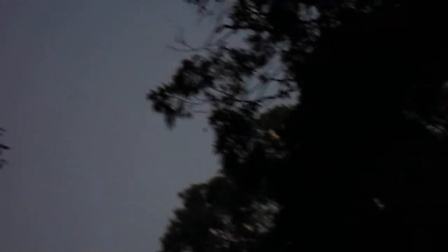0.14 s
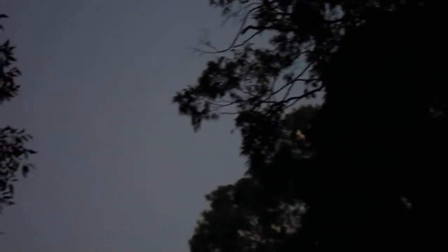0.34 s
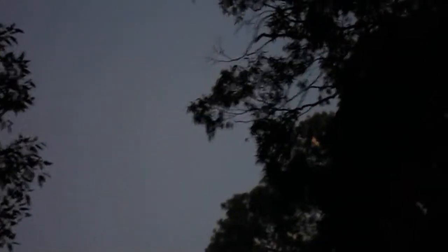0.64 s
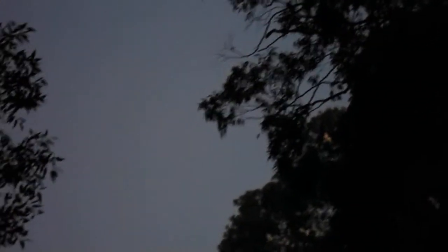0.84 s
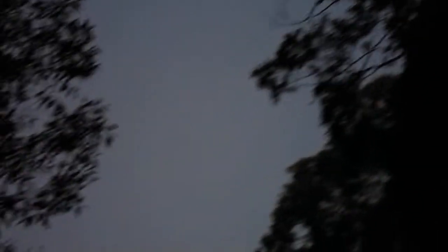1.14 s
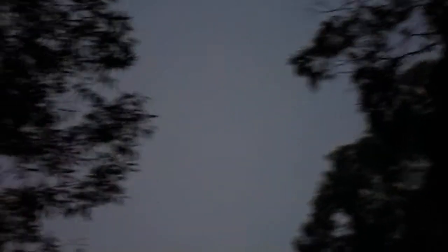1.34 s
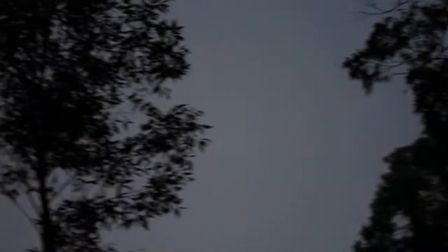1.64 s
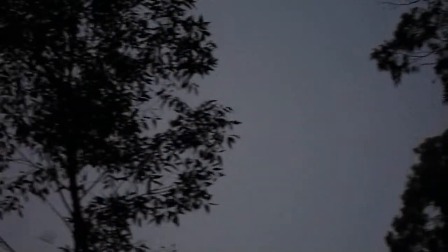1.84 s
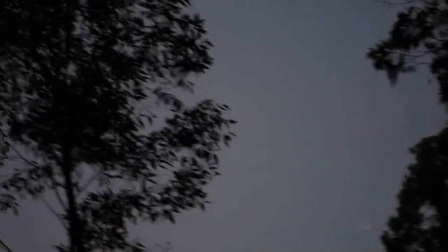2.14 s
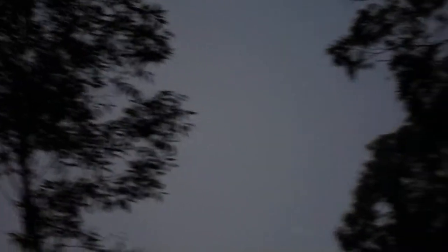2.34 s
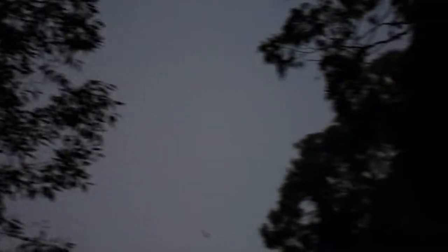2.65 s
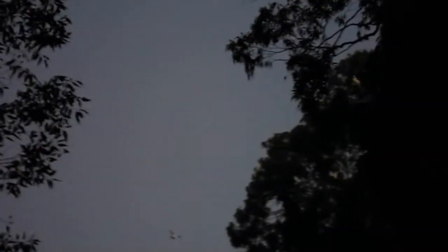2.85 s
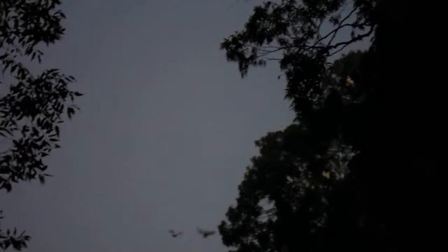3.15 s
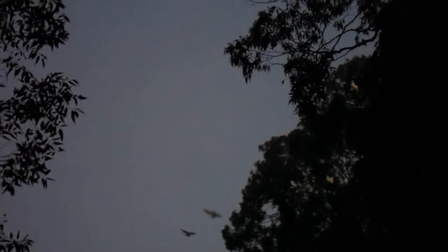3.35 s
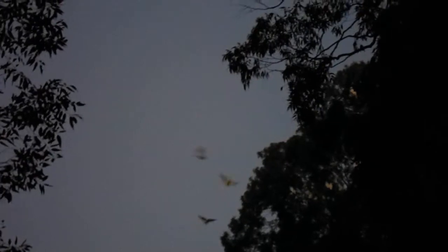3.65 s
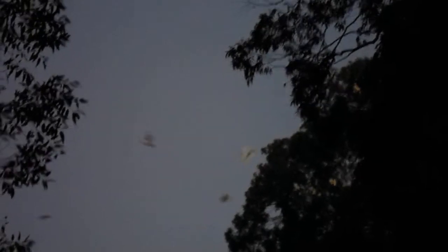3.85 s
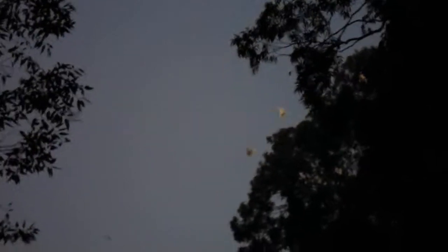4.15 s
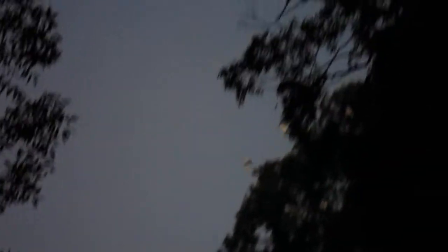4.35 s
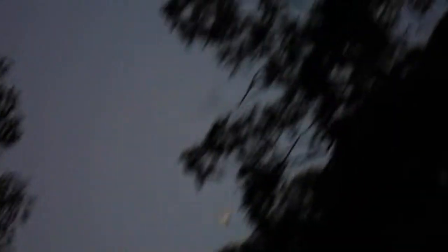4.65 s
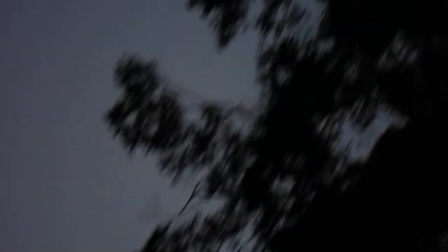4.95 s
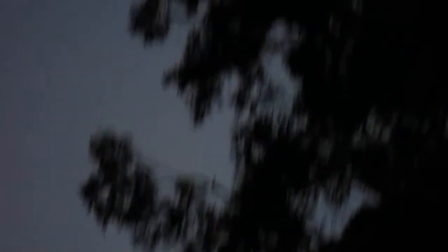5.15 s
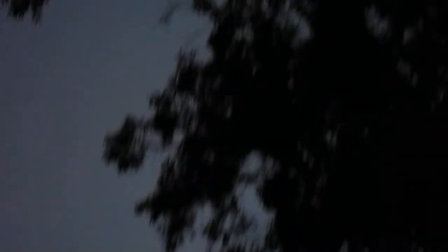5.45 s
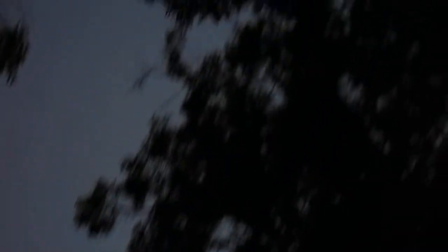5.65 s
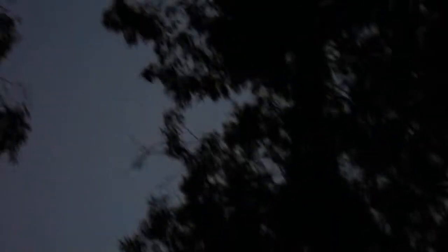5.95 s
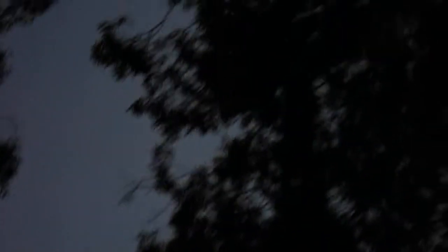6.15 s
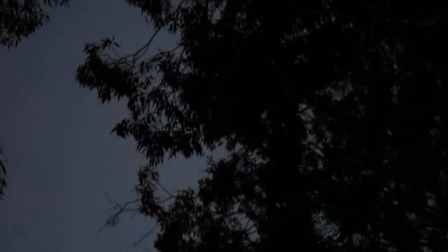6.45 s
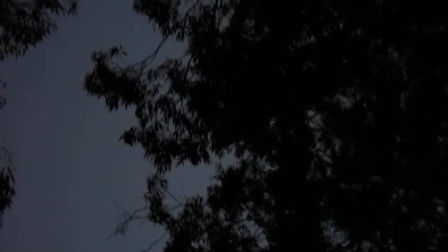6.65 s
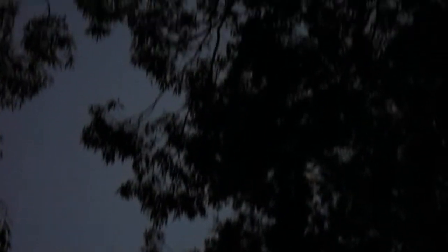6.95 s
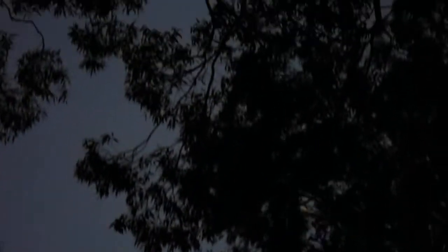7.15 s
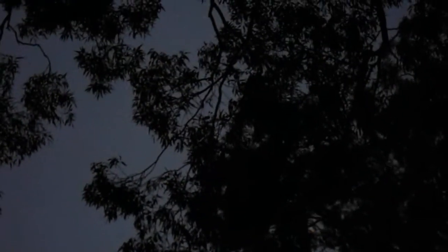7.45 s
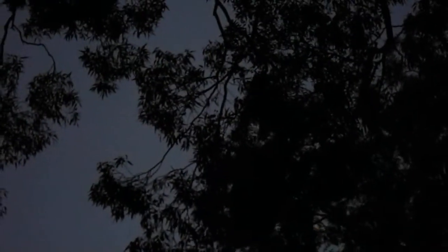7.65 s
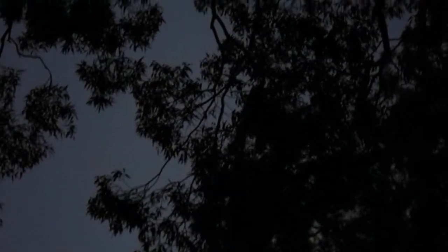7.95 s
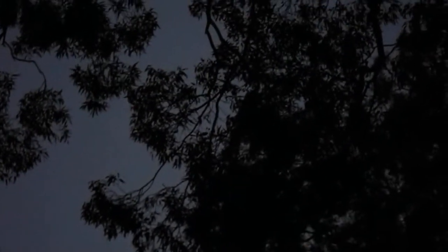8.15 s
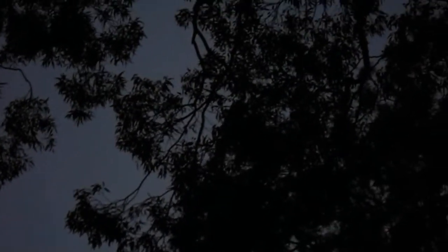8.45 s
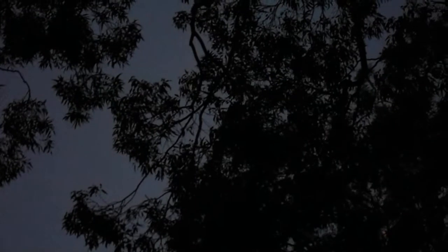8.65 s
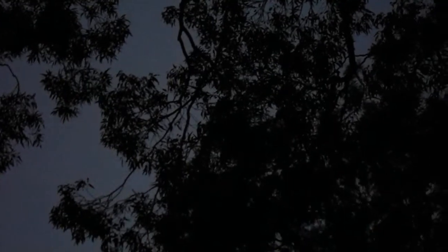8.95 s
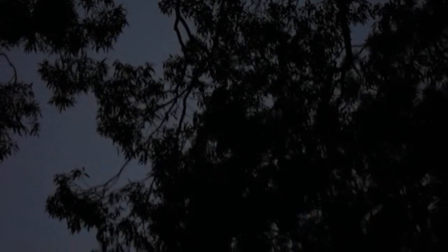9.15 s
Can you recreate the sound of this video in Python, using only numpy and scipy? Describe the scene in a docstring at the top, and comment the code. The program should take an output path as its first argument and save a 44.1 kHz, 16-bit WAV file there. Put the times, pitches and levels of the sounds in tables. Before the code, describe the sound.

Raucous cockatoos shriek and yelp without pause from roosting trees, closest calls piercing and raspy, echoing among trunks above a quiet low rumble.

```python
"""Cockatoo roost in the treetops

A large flock screeches at dusk. The nearest birds stand out call by call: each voice is a bank of
drifting harmonics shaped by throat and beak, and it echoes among the trees.
Farther back, many random calls of the same kind blend into a harsh chorus.
A faint two-order motor hum comes and goes over a low rumble of shaped noise.
One small microphone hears it all, alike in both channels."""
import sys
import numpy as np
from scipy import signal
from scipy.fft import rfft, irfft, next_fast_len
from scipy.io import wavfile
from scipy.ndimage import uniform_filter1d

SR = 44100
rng = np.random.default_rng(int(sys.argv[2]) if len(sys.argv) > 2 else 0)


def transcribe(u):
    """Save the signal u as a 16-bit wav file named by the first command-line argument.

    u: samples, shape (n,) or (channels, n), limited to [-1, 1]; the rate is SR.
    q: integer samples, one column per channel.
    """
    v = np.clip(np.atleast_2d(u).T, -1, 1)
    q = np.round(v * 32767).astype(np.int16)
    wavfile.write(sys.argv[1], SR, q)


N = 409688

# Short, high yelps close by: t/s, length/s, pitch f/Hz, pitch rise/Hz, level/dB, roughness (0-1),
# brightness/dB, beak resonance f/Hz
NEAR_YELPS = [(0, 0.074, 836, -14, -26, 0.46, 20, 2440), (0.293, 0.076, 890, -58, -21, 0.62, 8, 1820),
              (0.381, 0.092, 813, 35, -21.5, .35, 14, 3180), (0.668, 0.09, 838, 7, -21.5, 0.21, 13.5, 3200),
              (0.803, 0.069, 819, -16, -18.5, 0.21, 14, 1840),
              (1.591, 0.096, 818, 39, -23.5, 0.82, 16, 4000), (2.0, 0.091, 838, 49, -22.5, 0.8, 15, 2650),
              (2.084, 0.063, 898, 88, -21, 0.48, 16, 2680), (2.152, 0.082, 825, 9, -18.5, .14, 14, 1680),
              (3.087, 0.11, 800, -39, -30, 0.75, 18, 2450), (3.218, .09, 817, 39, -22.5, 0.7, 14.5, 2530),
              (3.317, 0.067, 855, -66, -18, 0.15, 18, 2620), (3.415, .018, 828, 5, -18.5, 0.15, 18.5, 2450),
              (3.45, 0.038, 859, 11, -20, .15, 10, 1700), (4.29, 0.091, 835, -39, -21, 0.53, 15, 2400),
              (5.376, 0.05, 881, 36, -20, 0.28, 12, 1770), (5.444, .068, 843, 77, -19, 0.32, 11, 1800),
              (6.742, .11, 905, 21, -23.5, 0.63, 9, 5050), (6.871, 0.049, 918, 56, -24.5, 0.6, 11, 2660),
              (7.227, 0.076, 849, 41.5, -22, 0.66, 9.5, 1730), (8.232, .095, 865, 69, -32.5, 0, 21, 7100),
              (8.335, 0.07, 853, 62, -33.5, 0.07, 25, 7000), (8.601, .12, 753, 76, -24.5, 0.37, 6, 5300)]
# Long screeches close by: t/s, length/s, pitch f/Hz, level/dB, roughness (0-1), brightness/dB,
# beak resonance f/Hz
NEAR_SCREECHES = [(1.235, 0.24, 730, -25, 0.71, 9, 4930), (1.509, 0.14, 683, -29, 0.18, 10, 2030),
                  (1.66, 0.13, 780, -26.5, 0.54, 18, 2350), (1.843, 0.17, 678, -21.5, 0.75, 13.5, 5470),
                  (2.258, 0.2, 691, -26, 0.59, 7, 1370), (2.657, .16, 740, -26, 0.46, -19, 2250),
                  (2.839, 0.2, 755, -26.5, 0.71, 13.5, 1900), (3.482, 0.041, 753, -35, .2, 2, 2200),
                  (3.559, 0.2, 966, -28, 0.25, 15.5, 2870), (3.624, 0.089, 707, -23, 0.15, -1, 3780),
                  (3.807, 0.37, 715, -26.5, 0.31, 13, 3730), (4.423, .23, 723, -24.5, 0.23, 14, 2200),
                  (4.649, 0.094, 842, -28, 0.4, 11, 4200), (5.581, 0.11, 765, -22, 0.88, 0, 2600),
                  (5.679, 0.14, 762.5, -18.5, 0.5, 9, 2300), (5.79, .25, 724, -21.5, 0.26, 6.5, 2220),
                  (6.152, 0.21, 733, -27, 0.5, 3, 3000), (6.37, .17, 786, -33.5, 0.05, 7, 5500),
                  (6.531, 0.082, 766, -22.5, 0.44, 5, 2470), (7.289, 0.28, 748, -25, 0.6, 6, 2250),
                  (8.07, 0.21, 778, -25.5, 0.65, 3, 2330), (8.49, 0.13, 956, -22.5, 0.14, 1, 950),
                  (8.752, 0.14, 766, -22.5, 0.14, 8, 2330), (8.869, 0.18, 797, -19.5, 0.65, 4, 2270)]
# A near bird's throat and open beak: f/Hz, level/dB
NEAR_THROAT = [(400, -37), (830, -16.5), (1150, -14.5), (1680, -2.5), (1980, -6.5), (2450, 5), (2900, -3.5),
               (3350, -2), (4100, -12.5), (5000, -11.5), (5800, -19), (6600, -19), (7400, -30), (9500, -30),
               (12000, -47.5), (16000, -56)]
# The same voices from across the trees: f/Hz, level/dB
FAR_THROAT = [(400, -35), (600, -20), (730, -13.5), (880, -13.5), (1030, -11), (1250, -4.5), (1420, -11.5),
              (1680, -9), (1950, -8), (2280, 0), (2520, -1), (2900, -7), (3950, -14.5), (4600, -12.5),
              (5800, -19.5), (6600, -21), (9500, -31.5), (16000, -58)]
# The farther birds' two kinds of call, about which each call varies:
# rate/(calls per s), length/s, roughness (0-1), pitch glide/(share of pitch), level/dB (relative)
FAR_CALL_KINDS = [(15, .22, .6, .09, 0), (18, .06, .3, .09, .5)]
# Strength of the farther birds together, before the chorus trim: t/s, level/dB
ROOST_LEVEL = [(0.0, -18.5), (0.67, -19), (1.03, -21.5), (1.37, -20.5), (1.91, -22.5), (2.07, -19),
               (2.59, -22.5), (3.02, -17.5), (3.28, -19), (3.67, -21), (4.58, -18.5), (4.99, -21.5),
               (5.28, -21), (5.56, -19.5), (5.77, -21.5), (6.29, -21.5), (6.65, -20.5), (7.14, -22),
               (7.45, -18.5), (8.02, -21), (8.38, -18.5), (8.85, -21), (9.06, -21.5), (9.29, -23.5)]
# Reverberation among the trees: f/Hz, t60/s
TREE_DECAY = [(300, 1), (2500, 1), (6000, 1), (14000, 0.45)]
# The motor's upper order: t/s, level/dB
HUM_LEVEL = [(0.0, -48), (0.17, -38.5), (0.62, -41.5), (0.66, -50), (0.93, -40), (1.12, -52), (1.18, -37),
             (1.24, -50.5), (1.92, -48), (2.07, -39.5), (2.72, -43.5), (2.77, -49), (3.92, -45),
             (4.04, -56), (4.3, -51)]
# A motor running up, its lower order: t/s, f/Hz, level/dB
MOTOR_RUN_UP = [(8.5, 43.5, -66), (8.7, 49.7, -49), (8.95, 54.5, -54), (9.29, 56.4, -50)]
# Spectrum of the open air, relative: f/Hz, level/(dB per Hz)
RUMBLE_SPECTRUM = [(20, -44), (45, -9.5), (80, -1.5), (170, 1.5), (300, 0.5), (450, -4), (900, 0.5),
                   (3000, -59), (16000, -36)]
# Strength of the open air: t/s, level/dB
RUMBLE_LEVEL = [(0, -40), (9.29, -38.5)]
# How much of a call's brightness reaches each pitch: f/Hz, share (0-1)
FACING = [(2800, 0), (5400, 0.45), (6600, 0.96), (14000, 1.0)]

YELP_ARCH_HZ = -5  # the middle of a yelp lies below the mean of its ends
SCREECH_ARCH_HZ, SAG_HZ_PER_S = 12, 170  # a screech bows upward and sinks as it goes on
BEAK_DB, BEAK_ROUGH_DB = 10.5, 6.5  # ring of a clear call; what full roughness takes away
ATTACK_SHARE, RELEASE_SHARE = 0.081, 0.038  # of a call's length
HUM_END_S, HUM_FADE_S = 4.15, 0.22  # the motor dies away
TOP_HZ = 15700  # the microphone's band limit


def near_birds(echo_db=-10, lead_s=.005):
    """The nearest birds yelp and screech, and the trees answer with delayed, scattered copies."""
    calls = np.zeros(N)
    for s, length, pitch, rise, db, rough, bright_db, beak_hz in NEAR_YELPS:
        call = cry(length, pitch, rise, YELP_ARCH_HZ, rough, bright_db, beak_hz)
        add(calls, s - lead_s, amp(db) * call)
    for s, length, pitch, db, rough, bright_db, beak_hz in NEAR_SCREECHES:
        sag = -SAG_HZ_PER_S * length
        call = cry(length, pitch, sag, SCREECH_ARCH_HZ, rough, bright_db, beak_hz)
        add(calls, s - lead_s, amp(db) * call)
    return calls + amp(echo_db) * trees(calls)


def cry(length, pitch, rise, arch, rough, bright_db, beak_hz, beak_width_hz=230):
    """One close call rings in throat and beak; a bird that faces the microphone is brighter."""
    def throat_and_beak(hz):
        facing_db = bright_db * along(FACING, hz)
        detune = (hz - beak_hz) / beak_width_hz
        beak_db = (BEAK_DB - BEAK_ROUGH_DB * rough) / (1 + detune ** 2)
        return amp(along(NEAR_THROAT, hz) + facing_db + beak_db)

    pitches = (pitch - rise / 2 - arch, pitch, pitch + rise / 2 - arch)
    source = syrinx(length + 0.0079, pitches, rough, waver=0.00722)
    voice = unit(filtered(source, throat_and_beak))
    return swell(voice, rise=ATTACK_SHARE * length, fall=RELEASE_SHARE * length)


def syrinx(length, pitches, rough, waver, chaos=1.63, forget=0.86, jitter=0.0195, flutter=0.02194,
           rasp_db=-1.0, uneven_db=1, size=64, count=512):
    """A voice made cycle by cycle: the rougher, the sooner each cycle stops resembling the last."""
    t = np.arange(int(np.clip(length, .03, .5) * SR)) / SR
    u = t / t[-1]
    rough = np.clip(rough, .05, 1)

    # a parabola through the first, middle and last pitch
    first, middle, last = pitches
    pitch = first * (2 * u - 1) * (u - 1) + middle * 2 * u * (2 - 2 * u) + last * u * (2 * u - 1)
    pitch = pitch * (1 + waver * wobble(t, 32.07))
    # an unsteady pitch blurs the highest harmonics most
    unsteady = jitter * wobble(t, 700) + flutter * wobble(t, 54.56)
    turns = np.cumsum(pitch * (1 + rough * unsteady)) / SR

    # every harmonic has a steady part and a part that drifts from cycle to cycle
    steady = np.exp(2j * np.pi * rng.random(20))
    memory = np.clip(1 - forget * rough, 0, .98)
    kicks = rng.standard_normal((count, 20, 2)) @ [1, 1j] / np.sqrt(2)
    drift = signal.lfilter([np.sqrt(1 - memory ** 2)], [1, -memory], kicks, axis=0)
    share = np.clip(chaos * rough, 0, 1)
    harmonics = np.sqrt(1 - share) * steady + np.sqrt(share) * drift
    harmonics = harmonics * amp(uneven_db * rng.uniform(-1, 1, 20))

    # lay the cycles end to end and read them at the moving pitch
    cycles = irfft(np.pad(harmonics, ((0, 0), (1, 0))), 2 * size).ravel()
    voice = np.interp(turns * 2 * size % len(cycles), np.arange(len(cycles)), cycles)
    loudness_db = rough * rasp_db * wobble(t, 177.6) + 0.44 * wobble(t, 44.2)
    return unit(voice) * amp(loudness_db)


def swell(x, rise=.02, fall=.01):
    """A call builds up and breaks off in straight ramps, rise and fall in seconds."""
    t = np.arange(len(x)) / SR
    return x * np.clip(np.minimum(t / rise, (t[-1] - t) / fall), 0, 1)


def trees(x, size=SR, gap_s=.012):
    """Trunks and leaves scatter the sound into a noise tail whose treble dies first."""
    hz, t, z = signal.stft(rng.standard_normal(size), SR, nperseg=256)
    decay = amp(-60 * t / along(TREE_DECAY, hz)[:, None])
    tail = signal.istft(z * decay, SR, nperseg=256)[1]
    delayed = np.pad(x, (int(gap_s * SR), 0))
    return signal.fftconvolve(delayed, tail / np.linalg.norm(tail))[:N]


def roost(pitch_hz=785, spread=.11, direct_db=3, level_db=-1.0, throat_spread=0.075):
    """Farther birds overlap in long hoarse screeches and short clearer yelps, each voice its own."""
    calls = np.zeros(N)
    for rate, length, rough, glide, db in FAR_CALL_KINDS:
        slots = np.arange(-.2, N / SR, 1 / rate)
        draws = rng.uniform(-1, 1, (len(slots), 7))
        for slot, (when, long, high, tilt, loud, harsh, build) in zip(slots, draws):
            fall = glide * (tilt + 0.3015)
            pitches = pitch_hz * np.exp(spread * high + np.array([fall, .03, -fall]))
            call = syrinx(length * (1 + long / 2), pitches, rough * (1 + 0.361 * harsh),
                          waver=0.01399, uneven_db=5.5)
            stretch = np.exp(throat_spread * build)  # birds differ in throat size
            call = filtered(call, lambda hz: amp(along(FAR_THROAT, hz * stretch)))
            call = swell(call, rise=length / 5, fall=length / 7)
            add(calls, slot + when / rate / 2, amp(db + 3.35 * loud) * call)
    calls = unit(calls)
    chorus = amp(direct_db) * calls + trees(calls)
    # held to an even strength, the whole roost then swells and ebbs together
    chorus /= np.sqrt(np.abs(uniform_filter1d(chorus ** 2, size=SR // 7)) + 1e-9)
    return chorus * amp(curves(ROOST_LEVEL)[0] + level_db)


def hum(pitch_hz=60.4, low_db=-4, octave_db=-3):
    """A faint motor hums on two low orders an octave apart, fades away, and runs up later."""
    t = np.arange(N) / SR
    phase = 2 * np.pi * np.cumsum(pitch_hz * (1 + 0.0028 * wobble(t, 4.3))) / SR
    fade = np.clip((HUM_END_S - t) / HUM_FADE_S, 0, 1)
    orders = amp(low_db) * np.sin(phase) + np.sin(2 * phase)
    early = fade * amp(curves(HUM_LEVEL)[0]) * orders

    pitch, db = curves(MOTOR_RUN_UP)
    phase = 2 * np.pi * np.cumsum(pitch) / SR
    late = amp(db) * (np.sin(phase) + amp(octave_db) * np.sin(2 * phase))
    return np.sqrt(2) * (early + late)  # levels are rms


def rumble():
    """The low murmur of the open air is noise weighted toward the bass."""
    murmur = filtered(rng.standard_normal(N), lambda hz: amp(along(RUMBLE_SPECTRUM, hz)))
    return amp(curves(RUMBLE_LEVEL)[0]) * unit(murmur)


def amp(db):
    """Decibels to gain."""
    return 10 ** (np.asarray(db) / 20)


def unit(x):
    """Scale to rms 1."""
    return x / np.sqrt(np.mean(x ** 2) + 1e-20)


def along(points, hz):
    """Read (f/Hz, value) points on a log frequency axis."""
    f, v = np.transpose(points)
    return np.interp(np.log(hz + 1), np.log(f + 1), v)


def curves(rows):
    """One value per sample for each column after the time."""
    s, *cols = np.transpose(rows)
    return [np.interp(np.arange(N) / SR, s, c) for c in cols]


def wobble(t, rate, size=512):
    """A random curve over the times t, with rate knots a second."""
    return np.interp(t * rate % size, np.arange(size), rng.standard_normal(size))


def filtered(x, response):
    """Weight the spectrum of x by a response of frequency."""
    m = next_fast_len(len(x) + 2048, True)
    return irfft(rfft(x, m) * response(np.fft.rfftfreq(m, 1 / SR)), m)[:len(x)]


def add(track, s, x):
    """Mix x into the track from time s; what falls outside is dropped."""
    at = int(s * SR) + np.arange(len(x))
    inside = (at >= 0) & (at < N)
    track[at[inside]] += x[inside]


def scene():
    """Near birds, roost, hum and rumble reach one microphone, alike in both channels."""
    return np.tile(near_birds() + roost() + hum() + rumble(), (2, 1))


def record(dry, notch_hz=7900, notch_width_hz=380):
    """The microphone has a narrow treble notch and passes nothing above its band limit."""
    def microphone(hz):
        offset = hz - notch_hz
        notch = np.hypot(offset, 25) / np.hypot(offset, notch_width_hz)
        return notch * (hz < TOP_HZ)

    return np.array([filtered(x, microphone) for x in dry])


dry = scene()
out = record(dry)
transcribe(out)
```